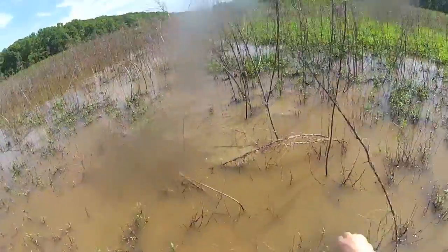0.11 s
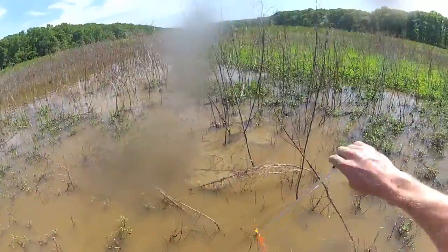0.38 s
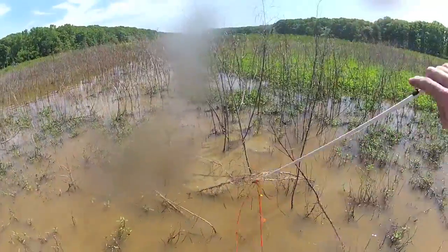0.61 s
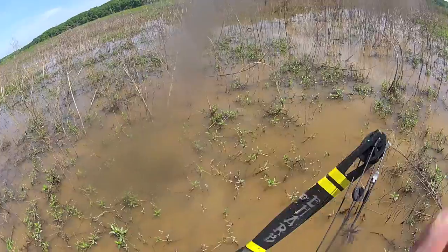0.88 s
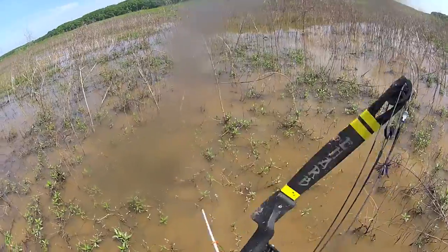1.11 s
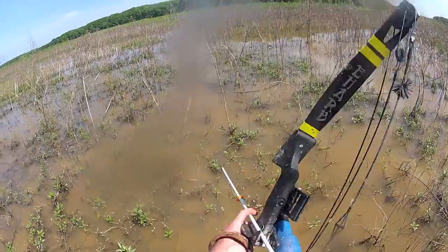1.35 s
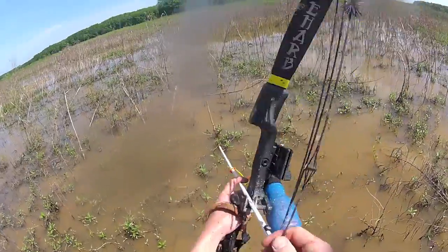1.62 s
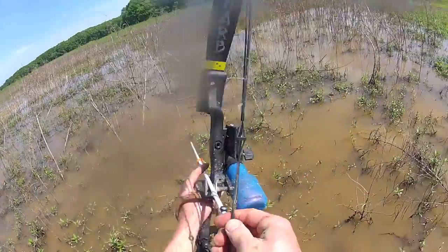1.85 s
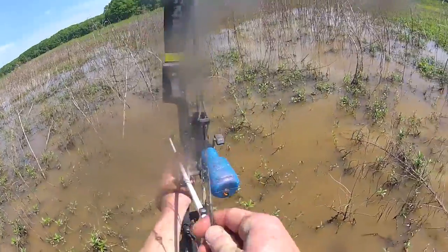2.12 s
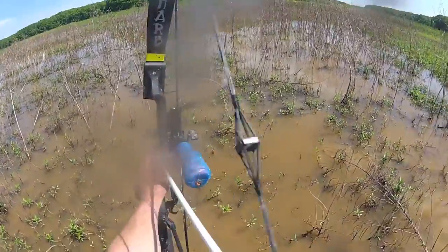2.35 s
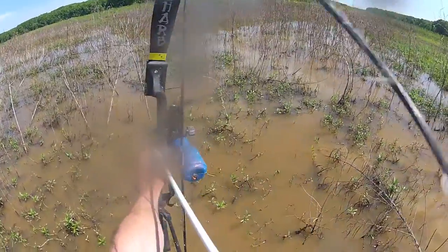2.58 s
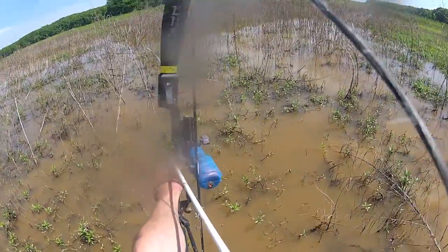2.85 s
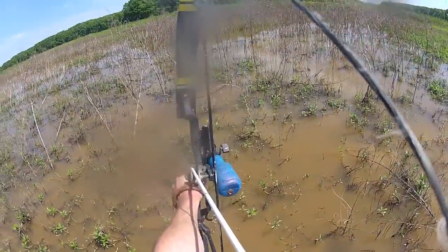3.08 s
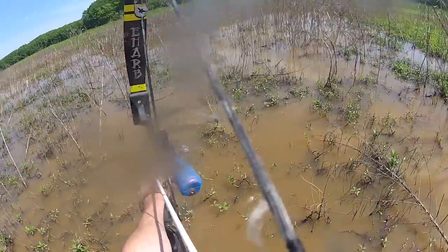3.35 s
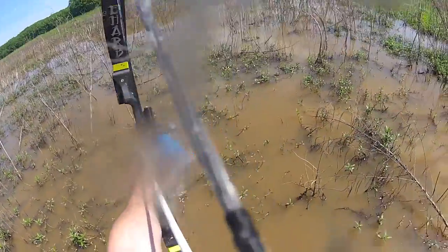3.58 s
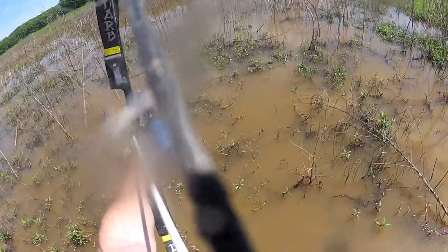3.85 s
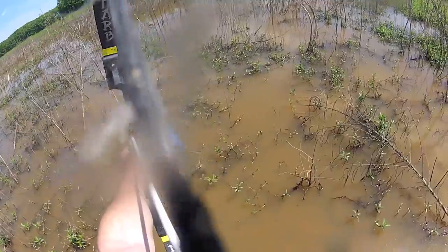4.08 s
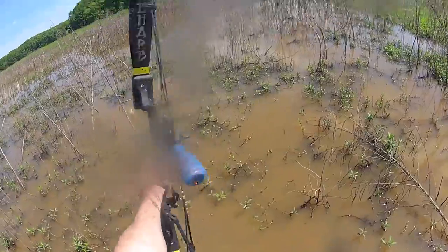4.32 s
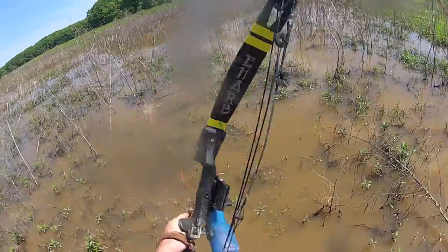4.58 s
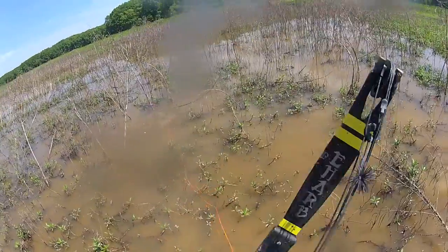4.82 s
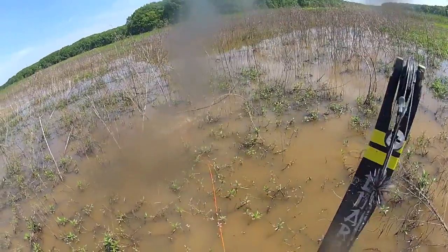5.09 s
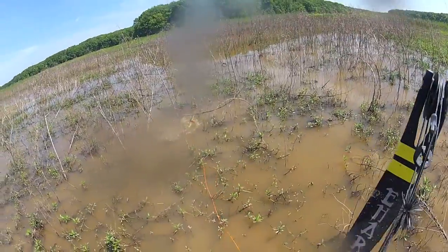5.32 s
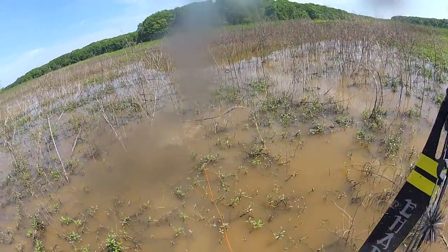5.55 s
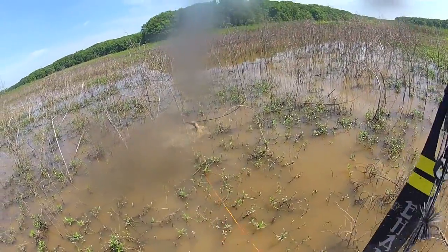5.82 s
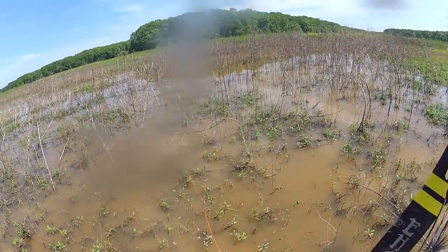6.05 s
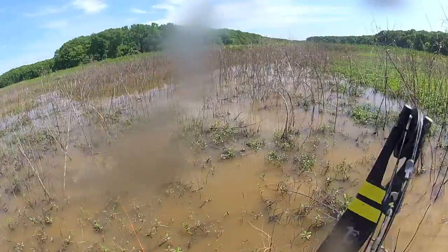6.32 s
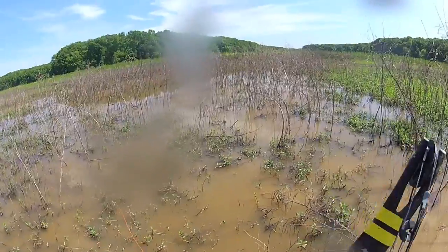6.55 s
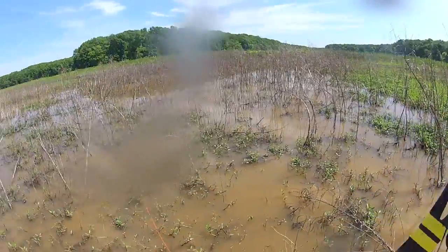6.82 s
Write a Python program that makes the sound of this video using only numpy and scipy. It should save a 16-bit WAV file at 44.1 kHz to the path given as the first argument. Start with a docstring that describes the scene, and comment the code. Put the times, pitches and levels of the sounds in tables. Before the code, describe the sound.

A close, gritty outdoor sound with no echo, over soft open-air noise and low wind that swells near 0.25 and 2.6 s. At first muddy water gurgles lightly, with dry ticks, the clearest at 0.4 s, and a few plops up to 0.8 s. Around 0.86 s the level drops almost to silence and quickly returns. From 1.2 to 3.9 s the bow creaks in irregular double slips, with short groans near 2 and 2.5 s, small clicks at 2.3-2.7 s and a very faint, fuzzy high whistle. It quiets before 4.3 s, when the shot bursts out: sharp cracks, deep thump, brief rattle, then another crack and gliding water plops at 4.4 s. Low limb shivers fade by 4.9 s amid dense bubbles, drips and spray. Gurgling sloshes and low gulps continue, and from 5.8 s a hollow hum near 600 Hz colours the water until the end.

```python
"""Air, wind rumble and stirred muddy water open the scene: someone stands and wades, then draws a creaking bow.
The arrow is shot into the water: blows crack and thump, then water gurgles and sloshes; late, a hollow body hums.
Noise is shaped by spectra and level curves; bubbles and ticks are damped sines; the bow is pushed resonances.
An edit dips the level almost to silence; 12 kHz samples held without smoothing mirror all about 6 and 12 kHz."""
import sys
import numpy as np
from scipy import signal
from scipy.fft import rfft, irfft, next_fast_len
from scipy.io import wavfile
from scipy.ndimage import map_coordinates

SR = 44100
rng = np.random.default_rng(int(sys.argv[2]) if len(sys.argv) > 2 else 0)


def decibels_to_gain(level_db):
    """Convert a level in decibels to a linear amplitude gain (20 dB per decade)."""
    exponent = np.asarray(level_db, float) / 20
    return 10 ** exponent


def wrap_up_sound(samples):
    """Save the sound to the file named by the first command line argument, as 16-bit audio."""
    columns = np.atleast_2d(samples).T
    # keep every value between -1 and 1, then stretch to whole-number steps
    tamed = np.clip(columns, -1, 1)
    steps = np.round(tamed * 32767).astype(np.int16)
    wavfile.write(sys.argv[1], SR, steps)


N = 305613
HUM_FROM_S = 5.76  # from here a hollow body, probably the line bottle, hums near 600 Hz and plops ring longer


def unit(x):
    """Scaled to rms 1."""
    return x / np.sqrt(np.mean(x ** 2) + 1e-20)


def noise():
    """White noise over the whole scene."""
    return rng.standard_normal(N)


def sparse_noise(rate_hz):
    """Random pushes, on average rate_hz a second."""
    return noise() * (rng.random(N) < rate_hz / SR)


def impulses(s, db):
    """One click per row, at time s."""
    return np.bincount((np.asarray(s) * SR).astype(int), decibels_to_gain(db), N)


def curves(rows, **ends):
    """One value per sample for each column after the time."""
    s, *cols = np.transpose(rows)
    return [np.interp(np.arange(N) / SR, s, c, **ends) for c in cols]


def wobble(rate_hz):
    """A smooth random curve, rate_hz knots a second."""
    knots = rng.standard_normal(int(N * rate_hz / SR) + 4)
    return map_coordinates(knots, [np.arange(N) * rate_hz / SR])


def filtered(x, response):
    """x times a complex response of frequency."""
    m = next_fast_len(N + 8192)
    return irfft(rfft(x, m) * response(np.fft.rfftfreq(m, 1 / SR)), m)[:N]


def coloured(x, spectrum):
    """x through (frequency [Hz], level [dB]) points on a log axis, rms 1."""
    f, db = np.transpose(spectrum)
    return unit(filtered(x, lambda hz: decibels_to_gain(np.interp(np.log(hz + 1), np.log(f + 1), db))))


def resonant(x, modes):
    """x through (frequency [Hz], width [Hz], level [dB]) resonances of alternating sign."""
    def response(f):
        total = 0
        for k, (hz, width_hz, db) in enumerate(modes):
            damping = 1j * f * width_hz
            total = total + (-1) ** k * decibels_to_gain(db) * damping / (hz * hz - f * f + damping)
        return total
    return filtered(x, response)


def pings(s, gain, hz, t60, rise, attack, size):
    """Sum of damped sines, one per row; pitch climbs by the share rise over t60."""
    t = np.arange(size) / SR
    s, gain, hz, t60 = (np.asarray(v, float)[:, None] for v in (s, gain, hz, t60))
    phase = 2 * np.pi * hz * (t + rise * t * t / (2 * t60))
    wave = gain * decibels_to_gain(-60 * t / t60) * (1 - np.exp(-t / attack)) * np.sin(phase)
    at = (s * SR).astype(int) + np.arange(size)
    return np.bincount(at.ravel(), wave.ravel(), N + size)[:N]


def grains(count, hz, spread, cycles, size_db, rise, size):
    """Random bubbles of rms 1: log-normal pitch, a few much larger than the rest."""
    when, big = rng.random((2, count))
    pitch = hz * np.exp(spread * rng.standard_normal(count))
    gain = decibels_to_gain(-size_db * np.log(big))
    return unit(pings(when * N / SR, gain, pitch, cycles / pitch, rise, 0.00043, size))


def puffs(s, db, t60, spectrum):
    """Short bursts of coloured noise that die away by 60 dB in t60."""
    envelope = signal.lfilter([1], [1, -decibels_to_gain(-60 / (t60 * SR))], impulses(s, db))
    return envelope * coloured(noise(), spectrum)


# open-field air: (frequency [Hz], relative level [dB per Hz])
AIR = [(15, -26), (25, -12.5), (100, -0.5), (260, -6.5), (500, -9.5), (700, -18.5), (900, -19.5),
       (1500, -24), (2800, -23), (3300, -24.5), (4900, -30), (5900, -35), (6500, -120)]


def air():
    """Steady air of the open field: coloured noise with a slow, slight drift in level."""
    return decibels_to_gain(-56.5 + 0.58 * wobble(2.96)) * coloured(noise(), AIR)


# wind level: (time [s], level [dB])
WIND = [(0, -63), (.25, -51.5), (.48, -72), (1.05, -63), (1.66, -70), (2.3, -60.5), (2.6, -52.5),
        (2.8, -59), (3.7, -60), (4.2, -68), (4.5, -61), (5.2, -66), (6.0, -60.5), (6.93, -62)]
# wind spectrum: (frequency [Hz], relative level [dB per Hz])
RUMBLE = [(20, -2), (35, 3.5), (90, -2.5), (160, -12), (300, -15), (600, -120)]


def wind_rumble():
    """Wind as low noise that rises and falls."""
    rumble_db, = curves(WIND)
    return decibels_to_gain(rumble_db + 2.5 * wobble(5.07)) * coloured(noise(), RUMBLE)


# water between swells: (time [s], gurgle level [dB], fizz level [dB], sizzle level [dB])
STIR = [(0, -65, -64.5, -69.5), (.27, -55, -66, -70), (.5, -60, -66.5, -63.5), (.72, -54, -60.5, -71),
        (.83, -49, -58, -90), (.9, -61.5, -66.5, -88), (1.5, -67, -76.5, -86), (2.0, -58, -60, -82),
        (2.3, -50, -57.5, -67.5), (2.68, -53.5, -59.5, -67), (2.8, -70, -74, -93), (3.5, -76, -76, -86),
        (3.75, -61, -70, -86), (4.29, -83, -88, -86), (4.33, -51.5, -47.5, -54), (4.72, -46, -54, -65),
        (4.8, -48, -59.5, -72.5), (5.0, -54, -53, -72), (5.3, -48, -54.5, -81), (5.58, -58.5, -60, -68),
        (5.76, -43.5, -53.5, -66), (6.0, -49, -53, -65), (6.18, -52, -56.5, -64.5),
        (6.46, -53.5, -59.5, -65.5), (6.76, -56, -63, -66.5)]
# swells: (peak time [s], gurgle lift [dB], spray lift [dB], rise [s], fall [s])
SWELLS = [(.19, 4, 0.5, 0.1, 0.025), (1.09, 2.5, 10, 0.049, 0.029), (3.68, 4, -4, .08, 0.069),
          (4.469, 15, 5, 0.079, 0.042), (4.64, 8, 2, 0.15, 0.077), (4.86, 10.5, -1, 0.017, 0.045),
          (4.97, 9.5, 7.5, 0.097, .05), (5.07, 3, 9, 0.015, 0.024), (5.151, 20, -2, 0.065, 0.046),
          (5.37, 8.5, 2, 0.15, .04), (5.714, 10, 4.5, 0.028, 0.036), (6.085, 10, 5, 0.13, 0.069),
          (6.349, 12.5, 7, .15, 0.066), (6.41, 6.5, 2, 0.037, 0.034), (6.61, 15, 6.5, 0.16, 0.067),
          (6.67, 8, 4, .04, 0.045), (6.82, 12, 4, 0.06, 0.055), (6.89, 16, 10, .06, 0.12)]


def water_levels():
    """Stirring levels plus triangular swells, whose lifts add in dB."""
    t = np.arange(N) / SR
    shapes = np.array([np.interp(t, [s - rise, s, s + fall], [0, 1, 0]) for s, _, _, rise, fall in SWELLS])
    lift_db, spray_db = np.array(SWELLS)[:, 1:3].T @ shapes
    return *curves(STIR), lift_db, spray_db


# slosh spectrum: (frequency [Hz], relative level [dB per Hz])
SLOSH = [(90, -27), (140, -6.5), (220, 2), (290, -3), (450, -34.5)]


def slosh(gurgle_db, lift_db):
    """Low water noise that follows the gurgle in part."""
    level_db = -62 + 0.6 * (gurgle_db + 60) + 0.19 * lift_db
    return decibels_to_gain(level_db + 2.6 * wobble(18)) * coloured(noise(), SLOSH)


# fixed hollow resonances: (frequency [Hz], width [Hz], level [dB])
HOLLOW = [(300, 80, -5), (420, 120, -12), (605, 80, 0), (780, 90, -8)]
# gurgle wash: (frequency [Hz], relative level [dB per Hz])
GURGLE = [(71, -52), (120, -41), (204, -11.5), (300, -4), (340, 0), (476, -0.5), (605, -10), (882, -16.5),
          (1200, -15.5), (1560, -40), (2640, -120)]


def gurgle(level_db):
    """Many small climbing bubbles, a hollow rung by sparse pushes, and a wash of noise."""
    small = grains(count=1600, hz=515, spread=0.264, cycles=22.6, size_db=1.0, rise=0.17, size=2200)
    rung = resonant(sparse_noise(400), HOLLOW)
    hollow = unit(resonant(rung, [(484, 1050, 0)]))
    wash = coloured(noise(), GURGLE)
    mix = 0.66 * small + 0.76 * hollow + 0.5 * wash
    return decibels_to_gain(level_db) * unit(decibels_to_gain(0.94 * wobble(22)) * mix)


# fizz spectrum, also for drop splashes: (frequency [Hz], relative level [dB per Hz])
FIZZ = [(500, -35), (900, 3), (1500, -8.5), (2400, 1), (3200, -1), (4000, -15.5), (5900, -58)]
# sizzle spectrum: (frequency [Hz], relative level [dB per Hz])
SIZZLE = [(3600, -6.5), (4200, -6.5), (5000, 4), (5500, -5.5), (6000, -14), (6500, -60)]


def spray(fizz_db, sizzle_db, spray_db):
    """The breaking surface: tiny bubbles and noise in bunches shared by fizz and sizzle."""
    burst = decibels_to_gain(2.57 * wobble(30) + 2.2 * wobble(9))
    crackle = grains(count=3500, hz=2100, spread=0.384, cycles=24.4, size_db=2.5, rise=0.38, size=900)
    fizz = unit(burst * (0.95 * crackle + coloured(noise(), FIZZ)))
    sizzle = unit(burst * coloured(noise(), SIZZLE))
    return decibels_to_gain(spray_db) * (decibels_to_gain(fizz_db) * fizz + decibels_to_gain(sizzle_db) * sizzle)


# arrow, line and fittings: (time [s], level [dB], pitch [Hz], hiss over tick [dB])
TICKS = [(0.0114, -37, 3300, -11), (0.151, -40, 3080, -13), (0.2798, -46, 3440, -4), (0.294, -43, 1872, -6),
         (0.4129, -31.5, 2980, -9.5), (0.7766, -39.5, 2040, -22), (1.0026, -37.5, 2020, -28),
         (1.069, -42.5, 2020, -23), (1.9303, -44, 2360, -11), (2.2608, -38, 3037, -19),
         (2.3408, -36.5, 2400, -20), (2.4215, -37.5, 2460, -21), (2.4407, -37.5, 2394, -18),
         (2.487, -42, 3000, -19), (2.7017, -37, 3000, -13), (3.2717, -43.5, 2840, -5.5),
         (3.9102, -46, 2376, -18), (4.546, -36.5, 2100, 0.5), (4.593, -39.5, 2520, 0.5),
         (4.6317, -46, 2520, -3), (4.6555, -45, 2470, -11), (4.7014, -36, 2540, -26),
         (5.2277, -36.5, 2360, -15), (5.3952, -42, 3030, 2), (5.458, -42.5, 2070, -5),
         (5.8115, -41.5, 2200, -0.5)]


def ticks():
    """Dry knocks: damped sines of 20 cycles to -60 dB, each with a puff of hiss."""
    s, db, hz, hiss_db = np.transpose(TICKS)
    tones = pings(s, decibels_to_gain(db), hz, 20 / hz, 0, 0.000082, size=700)
    return tones + puffs(s, db + hiss_db, 0.036, [(1200, -32), (2500, 7), (4000, 0), (5500, -5.5)])


# loud single bubbles: (time [s], level [dB], start pitch [Hz])
PLOPS = [(0.424, -38.5, 345), (0.619, -37, 412), (0.69, -41, 382), (0.765, -30.5, 400), (4.454, -30, 640),
         (4.489, -23.5, 611), (4.559, -29, 410), (4.602, -24.5, 363), (4.641, -24, 524),
         (4.661, -23.5, 502), (4.849, -26.5, 527), (4.879, -32, 500), (4.961, -28, 587), (4.993, -30, 828),
         (5.076, -29.5, 667), (5.129, -35, 523), (5.145, -19, 488), (5.221, -26, 600), (5.3, -32, 383),
         (5.378, -21, 556), (5.624, -31.5, 560), (5.718, -24, 550), (5.732, -22, 378), (5.771, -42, 604),
         (5.843, -30, 547), (6.02, -28.5, 640), (6.043, -33, 690), (6.069, -25.5, 610), (6.321, -31, 510),
         (6.342, -28, 573), (6.394, -32.5, 600), (6.585, -31.5, 660), (6.602, -26, 606.7),
         (6.658, -29.5, 557), (6.785, -39, 559.6), (6.809, -36.5, 584), (6.867, -27.5, 597),
         (6.884, -31, 578)]


def plops():
    """Single bubbles ring and climb slightly in pitch."""
    s, db, hz = np.transpose(PLOPS)
    t60_s = np.where(s > HUM_FROM_S, 0.061, 0.039)
    return pings(s, decibels_to_gain(db), hz, t60_s, 0.066, 0.0011, size=4000)


# whistle phrases: (start [s], length [s], level [dB], first pitch [Hz], last pitch [Hz])
WHISTLE = [(.97, 0.17, -68, 3140, 3150), (1.352, 0.29, -72, 3240, 3130), (1.765, .3, -80, 3140, 3020),
           (2.682, 0.41, -76, 2730, 2680), (3.021, .3, -69.5, 2630, 2720), (3.452, 0.19, -74, 2760, 2660),
           (3.753, .4, -75, 2680, 2754)]


def whistle():
    """A faint, fuzzy high whistle: gliding sines with random pitch and level."""
    t, total, edge_s = np.arange(N) / SR, 0, 0.039
    for start, length, db, first_hz, last_hz in WHISTLE:
        glide_hz = np.interp(t, [start, start + length], [first_hz, last_hz])
        pitch_hz = glide_hz + 15 * wobble(9.4) + 45 * wobble(90)
        gate = np.clip(np.minimum(t - start, start + length - t) / edge_s, 0, 1)
        total = total + gate * decibels_to_gain(db + 3 * wobble(40)) * np.sin(2 * np.pi * np.cumsum(pitch_hz) / SR)
    return total


# bow slips: (time [s], push [dB], treble over push [dB])
CREAKS = [(1.194, -15, -21), (1.28, -11, -10), (1.393, -12.5, -16), (1.588, -10.5, -13), (1.634, -11, -14),
          (1.663, -8.5, -18), (1.727, -7, -14), (1.771, -6, -17), (1.819, -4.5, -15.5), (1.882, -8.5, -11),
          (2.358, -15, -6), (2.48, -8, -15), (2.659, -8, -9), (2.731, -5, -13), (2.805, -9.5, -12),
          (2.83, -15, -3.5), (2.88, -7.5, -14.5), (2.954, -6, -14), (3.046, -7.5, -11), (3.268, -14, -11),
          (3.326, -16.5, -10), (3.565, -12, -23), (3.634, -9.5, -19), (3.7, -4.5, -24), (3.783, -6.5, -16),
          (3.854, -10.5, -13), (3.89, -9, -15)]
# limb resonances, low, also for the groan: (frequency [Hz], width [Hz], level [dB])
LIMB = [(726.5, 56, 3.5), (1134, 120, -11.5)]
# riser resonances, high: (frequency [Hz], width [Hz], level [dB])
RISER = [(1530, 420, -2.5), (2150, 130, 1)]


def creaks():
    """Each slip catches and slips once more, usually weaker, ringing limbs low and riser high."""
    s, db, treble_db = np.transpose(CREAKS)
    gap, size = rng.standard_normal((2, 2, len(s)))
    nth = np.arange(2)[:, None]
    at_s = (s + nth * 0.011 * np.exp(0.25 * gap)).ravel()
    db = db + nth * (-2 + 2.9 * size)
    low = resonant(impulses(at_s, db.ravel()), LIMB)
    high = resonant(impulses(at_s, (db + treble_db).ravel()), RISER)
    return low + high


# groan of the draw: (time [s], level [dB])
DRAW = [(1.55, -82), (1.834, -58.5), (1.86, -67), (1.996, -54), (2.128, -66), (2.458, -70), (2.494, -51),
        (2.58, -96), (2.666, -58), (2.75, -65.5)]


def draw_groan():
    """Dense random slips ring the limbs while the string is drawn."""
    draw_db, = curves(DRAW, left=-120, right=-120)
    rung = resonant(sparse_noise(400), LIMB)
    return decibels_to_gain(draw_db) * unit(resonant(rung, [(780, 520, 0)]))


# blows: (time [s], thump [dB], crack [dB], crack pitch [Hz], rattle [dB])
SHOT = [(4.2915, -27, -34, 2950, -39.5), (4.303, -27, -20.5, 3270, -36), (4.3157, -16, -22, 2300, -39.5),
        (4.3245, -37, -4, 2540, -27), (4.3264, -8, -28, 2531, -41), (4.3289, -31, -10.5, 2790, -28.5),
        (4.3328, -17, -40, 2630, -46), (4.338, -28, -18, 3170, -41), (4.397, -56, -34, 2380, -36.5),
        (4.4026, -41, -11, 1820, -38.5), (4.43, -35, -39, 2480, -45)]
# bow modes: (frequency [Hz], level [dB], t60 [s])
BOW = [(45.3, -10, 0.23), (132.5, 4, 0.17), (265.5, -1.5, 0.17), (422, -15, 0.22), (600, -18, 0.28)]


def shot():
    """Release, limbs and arrow impact: each blow thumps the bow's modes, cracks and rattles."""
    s, thump_db, crack_db, crack_hz, rattle_db = np.transpose(SHOT)
    t = np.arange(SR // 2) / SR
    # limbs let go from a bent shape: every mode starts at its extreme
    modes = sum(decibels_to_gain(db - 60 * t / t60) * np.cos(2 * np.pi * hz * t) for hz, db, t60 in BOW)
    ring = -modes * (1 - np.exp(-t / 0.0016))
    thump = signal.fftconvolve(impulses(s, thump_db), ring)[:N]
    crack = pings(s, decibels_to_gain(crack_db), crack_hz, np.full_like(s, 0.013), 0, 0.00055, size=2000)
    crack_spectrum = [(500, -11), (1200, 3), (2700, 4), (4200, -10), (5200, -3), (5900, -11)]
    crack = crack + puffs(s, crack_db - 8.5, 0.0086, crack_spectrum)
    rattle_spectrum = [(250, 4), (600, 7), (1300, -12), (2600, -3), (3400, -5), (4200, -20.5),
                       (5100, -11), (5900, -18.5)]
    return thump + crack + puffs(s, rattle_db, 0.29, rattle_spectrum)


# closing cavities: (time [s], level [dB], start pitch [Hz], end pitch [Hz], t60 [s])
CAVITY = [(4.404, -6.5, 227, 182, 0.032), (4.4308, -7, 277, 600, 0.046), (4.441, -21.5, 603, 658, 0.074)]


def cavities():
    """Holes the arrow opens in the water close with gliding plops."""
    total = 0
    for start, db, start_hz, end_hz, t60 in CAVITY:
        t = np.clip(np.arange(N) / SR - start, 0, 1)
        pitch_hz = end_hz - (end_hz - start_hz) * np.exp(-t / 0.0074)
        phase = 2 * np.pi * np.cumsum(pitch_hz * (t > 0)) / SR
        total = total - decibels_to_gain(db - 60 * t / t60) * np.sin(phase)
    return total


# limb shiver: (time [s], level [dB])
SHIVER = [(4.47, -42), (4.504, -53), (4.538, -34.5), (4.616, -36), (4.648, -52), (4.706, -43), (4.728, -55),
          (4.82, -39.5), (4.862, -72), (4.9, -46)]


def limb_shiver():
    """Limbs shiver on: noise through two low resonances."""
    shiver_db, = curves(SHIVER, left=-120, right=-120)
    return decibels_to_gain(shiver_db) * unit(resonant(resonant(noise(), [(145, 17, 0)]), [(151, 47, 0)]))


# louder surface drops: (time [s], level [dB], start pitch [Hz])
DROPS = [(4.5466, -36, 2490), (4.592, -42, 3000), (4.6842, -36.5, 2400), (4.7162, -29, 2550),
         (4.858, -45, 2790), (4.8868, -41, 2110), (4.923, -37, 2870), (4.9575, -30.5, 1660),
         (4.9937, -35, 1830), (5.0567, -31, 1350), (5.1322, -43, 1100), (5.1704, -35.5, 2370),
         (5.26, -42, 1180), (5.3615, -42, 1140), (5.4516, -44.5, 1720), (5.487, -42.5, 1770),
         (5.6213, -38, 2450), (5.6423, -39.5, 2300), (5.7025, -33.5, 1920), (5.899, -39, 1770),
         (5.916, -30, 2370), (5.9492, -38.5, 2070), (6.0382, -36, 1930), (6.291, -41.5, 2280),
         (6.584, -42.5, 2820), (6.867, -42, 2450)]


def drops():
    """Listed drops and 30 random small ones ring short and high over a small splash."""
    when, size, pitch = rng.random((3, 30))
    drips = [4.55 + when * (6.0 - 4.55), -44 - 6 * size, 1500 * np.exp(0.8 * (pitch - 0.5))]
    s, db, hz = np.hstack([np.transpose(DROPS), drips])
    tones = pings(s, decibels_to_gain(db), hz, 34 / hz, 0.22, 0.00013, size=1500)
    return tones + puffs(s, db - 8, 0.02, FIZZ)


# low gulps: (time [s], level [dB], start pitch [Hz])
GULPS = [(5.152, -40, 208), (5.315, -34, 170), (5.698, -34.5, 180)]


def gulps():
    """Low gulps climb further in pitch and ring longer than the plops."""
    s, db, hz = np.transpose(GULPS)
    return pings(s, decibels_to_gain(db), hz, np.full_like(s, 0.13), 0.24, 0.0035, size=6000)


def hollow_hum(gurgle_db):
    """A hollow body, probably the line bottle: noise twice through one resonance, at a level tied to the gurgle."""
    mode = [(605, 75, 0)]
    ring = unit(resonant(resonant(noise(), mode), mode))
    late = np.arange(N) / SR > HUM_FROM_S
    return late * decibels_to_gain(gurgle_db - 3 + 2.3 * wobble(25)) * ring


def scene():
    """Everything, in the open."""
    gurgle_db, fizz_db, sizzle_db, lift_db, spray_db = water_levels()
    swollen_db = gurgle_db + lift_db
    water = slosh(gurgle_db, lift_db) + gurgle(swollen_db) + spray(fizz_db, sizzle_db, spray_db)
    water = water + plops() + cavities() + drops() + gulps()
    gear = ticks() + creaks() + draw_groan() + shot() + limb_shiver() + hollow_hum(swollen_db)
    return (air() + wind_rumble() + water + whistle() + gear)[None]


# edit fade, end values held: (time [s], gain)
EDIT = [(.8, 0.71), (.864, 0.021), (.866, 0.15), (.96, 0.7)]


def edit_fade(x):
    """Gain of about 0.7, dipping almost to silence at the edit."""
    gain, = curves(EDIT)
    return x * gain


def hold_12_khz(x):
    """Each 12 kHz sample is held four times at 48 kHz, which leaves mirror images."""
    slow = signal.resample_poly(x, 40, 147, axis=1)
    return signal.resample_poly(np.repeat(slow, 4, axis=1), 147, 160, axis=1)[:, :N]


def low_pass(x):
    """Removes everything above the highest recorded frequency."""
    return signal.sosfilt(signal.butter(12, 16410, fs=SR, output="sos"), x)


def record(dry):
    """The edit fade, then the 12 kHz hold."""
    mix = hold_12_khz(edit_fade(dry))
    return low_pass(mix)


dry = scene()
out = record(dry)
wrap_up_sound(out)
```